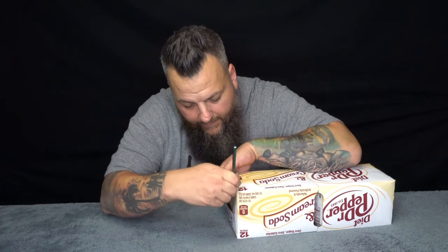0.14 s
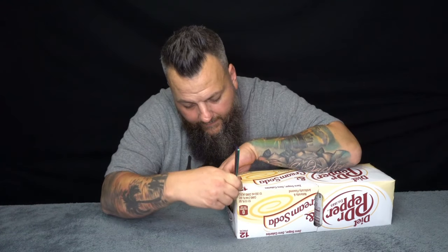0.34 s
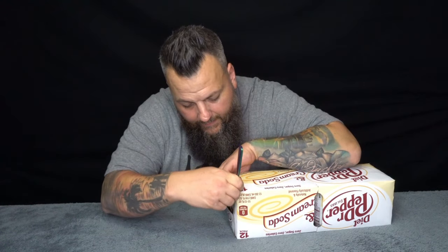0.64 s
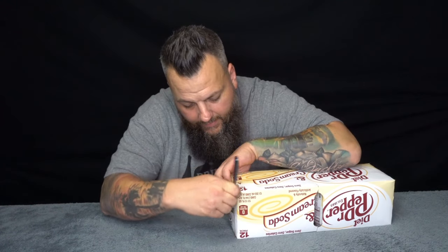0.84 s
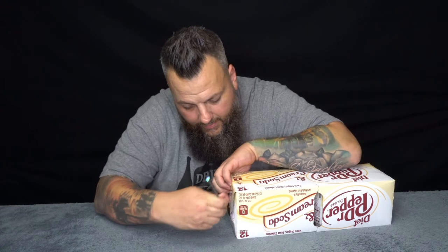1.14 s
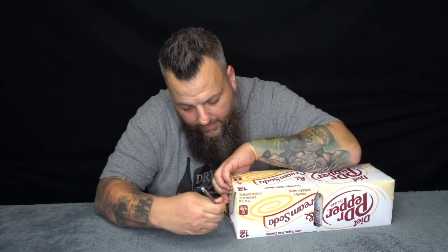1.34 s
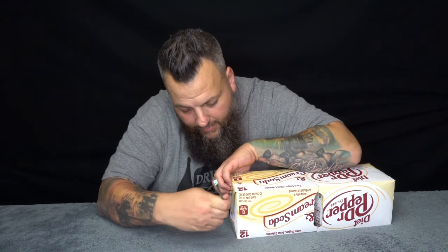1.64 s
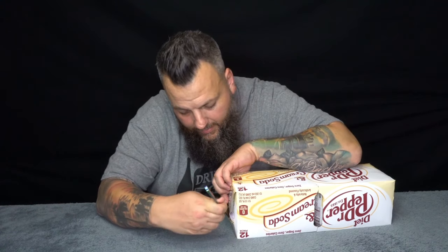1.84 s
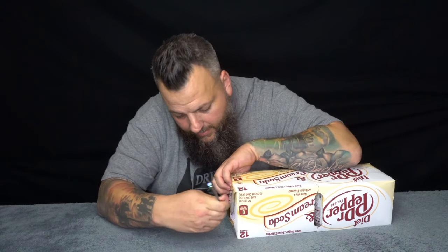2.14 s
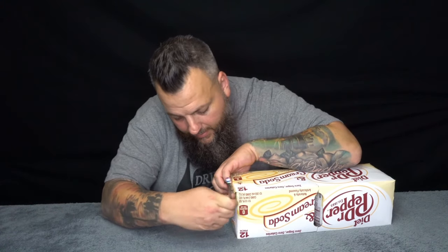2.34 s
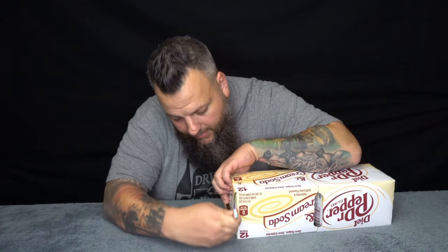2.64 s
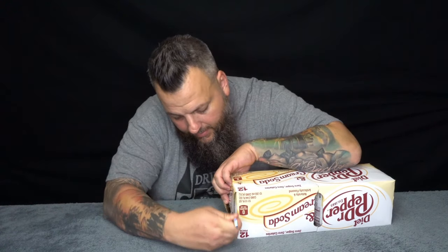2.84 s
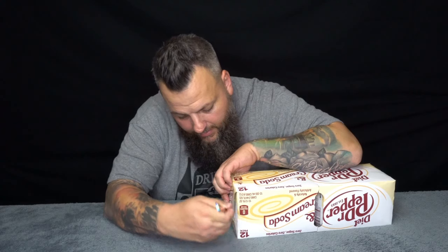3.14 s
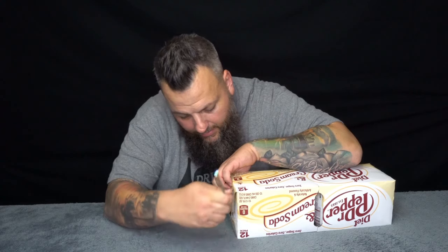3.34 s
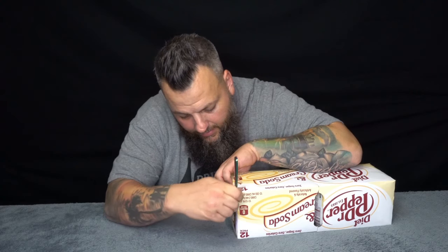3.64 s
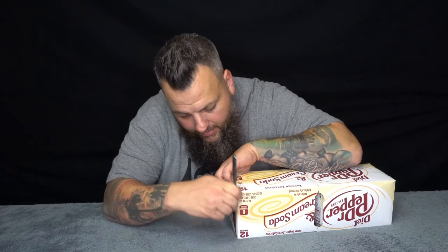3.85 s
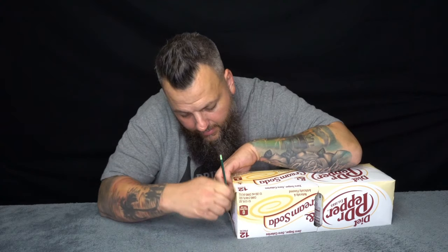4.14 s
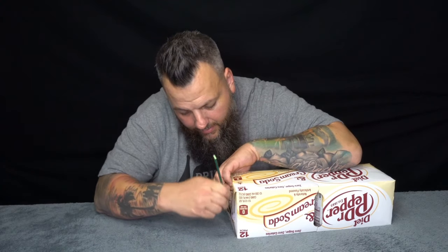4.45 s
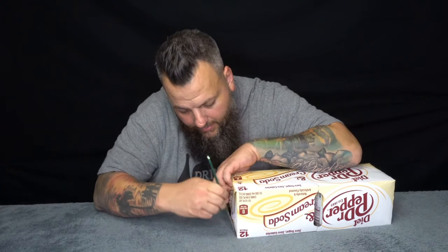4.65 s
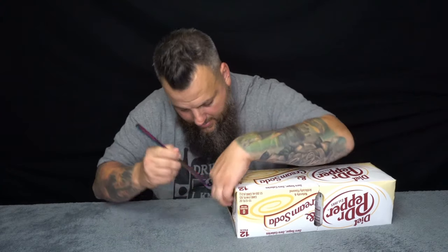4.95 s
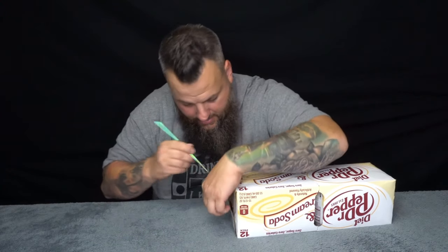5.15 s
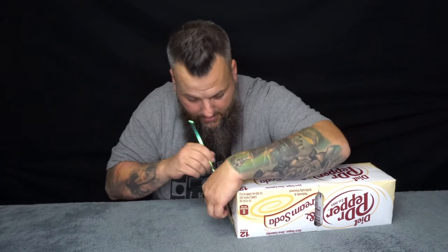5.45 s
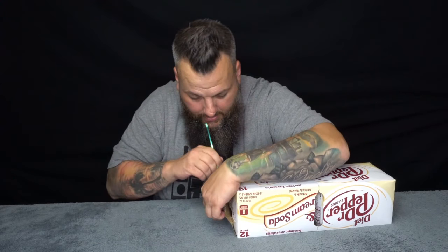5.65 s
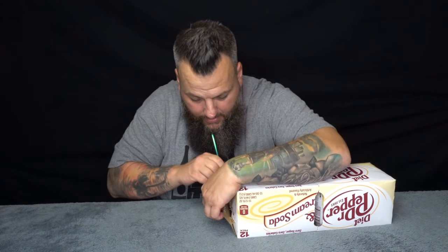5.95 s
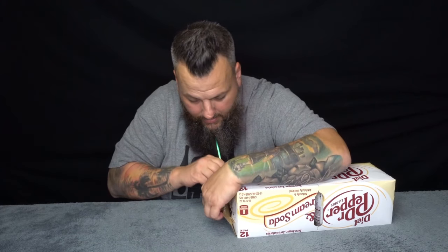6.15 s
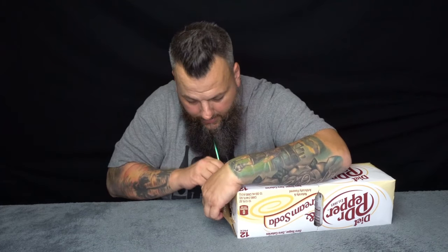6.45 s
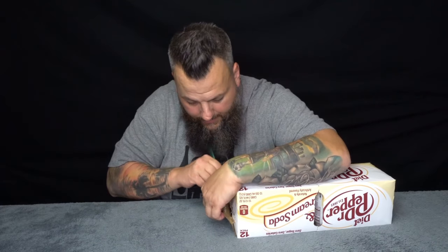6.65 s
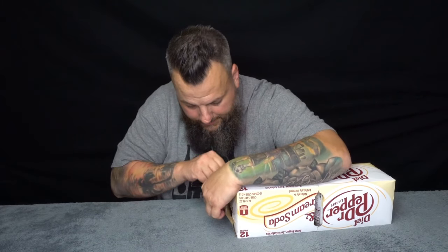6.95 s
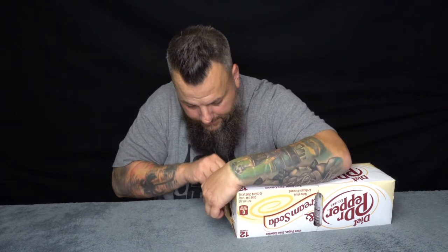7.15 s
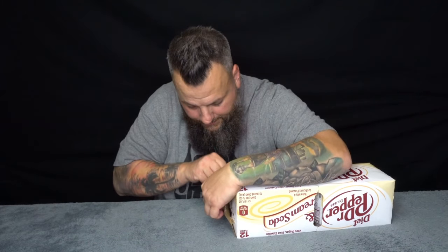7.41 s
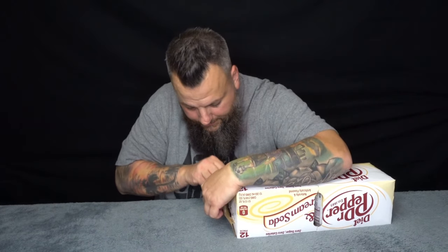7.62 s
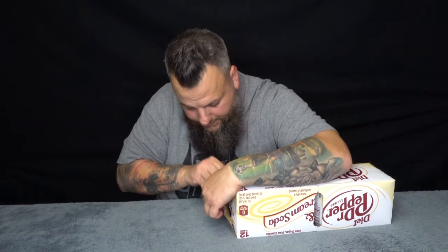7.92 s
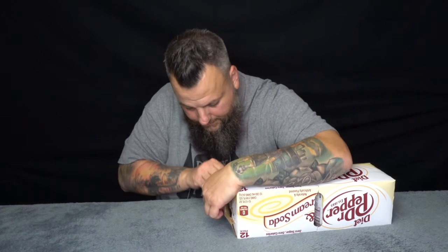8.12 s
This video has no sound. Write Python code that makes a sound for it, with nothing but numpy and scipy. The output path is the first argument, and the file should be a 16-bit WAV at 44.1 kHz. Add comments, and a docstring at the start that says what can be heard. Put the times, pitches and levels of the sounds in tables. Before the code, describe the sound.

A knife works along the glued flap of a full cardboard carton in a small, damped room with a faint low rumble. It starts with short, dry scrapes and a hollow knock at about 0.7 seconds. From 1.2 to 2 seconds fibres tear with a bright crackle, and glue snaps sharply at 1.2 and 1.9 seconds. Softer ticking and scraping lead to another snap near 3.1 seconds. From 3.7 to 4.8 seconds the blade rasps harder in quick, irregular strokes that resonate in the box, with a snap at 4.1 and a loud knock at 4.6. The flap cracks at 5.1 seconds and gives with the loudest hollow knock at 5.4. Lighter, papery scrapes and small taps follow, coming steadily from 7 seconds until the end at about 8.3, with one faint, brief squeak near 7.7.

```python
"""Knife opening a cardboard carton.

A knife saws and pries along the glued flap of a full carton in a small, damped room.
The blade sticks and slips, ringing the panels, and squeaks once on the coated card.
Fibres tear with a bright crackle, the flap knocks when it gives, and glue spots snap."""
import sys
import numpy as np
from scipy import signal
from scipy.fft import rfft, irfft, next_fast_len
from scipy.io import wavfile
from scipy.ndimage import uniform_filter1d

SR = 44100
rng = np.random.default_rng(int(sys.argv[2]) if len(sys.argv) > 2 else 0)


def to_wav(s):
    """Save 16-bit WAV."""
    ch = np.atleast_2d(s).T  # columns
    pcm = np.round(np.clip(ch, -1, 1) * 32767)  # PCM
    wavfile.write(sys.argv[1], SR, pcm.astype(np.int16))


N = 365110

# Blade strokes: (time [s], length [ms], pressure [dB], lead panel [Hz])
BLADE_STROKES = [(0.057, 104, -58, 810), (0.163, 143, -41, 740), (0.41, 410, -73, 317),
                 (0.656, 119, -31, 846), (0.9, 225, -69, 590), (1.096, 288, -56.5, 800),
                 (1.367, 88, -52.5, 454.4), (1.55, 830, -68.5, 1520), (1.95, 114, -64.5, 1800),
                 (2.2, 246, -82.5, 504), (2.438, 185, -61.5, 850), (2.57, 155, -66, 740),
                 (2.65, 168, -56.5, 750), (2.82, 130, -80, 690), (3.0, 180, -58.5, 815),
                 (3.057, 68, -40, 780), (3.53, 105, -58.5, 760), (3.62, 180, -69.5, 750),
                 (3.678, 124, -46, 730), (3.814, 110, -38.5, 717), (3.837, 25, -37.5, 694),
                 (3.859, 28, -41, 800), (3.913, 92.6, -31.5, 652), (4.076, 70, -39, 1950),
                 (4.124, 107, -31, 470), (4.19, 152, -46, 397), (4.324, 105, -33.5, 410),
                 (4.361, 40, -38, 1800), (4.405, 117, -50, 437), (4.523, 67, -39, 462),
                 (4.547, 39, -32, 910), (4.61, 214, -47, 320), (4.761, 110, -47, 650),
                 (4.82, 235, -61, 865), (4.96, 510, -55.5, 785), (5.2, 110, -95, 604),
                 (5.499, 155, -44, 720), (5.614, 115, -44, 663), (5.755, 91, -48, 477),
                 (5.8, 133, -43, 740), (6.058, 99, -49.5, 723), (6.3, 390, -66, 617),
                 (6.571, 120, -60, 1420), (6.66, 101, -55, 1250), (6.88, 145, -58, 650),
                 (7.0, 125, -43.5, 1110), (7.146, 117, -52, 1290), (7.256, 95, -47.5, 430),
                 (7.383, 120, -55.5, 1440), (7.496, 116, -44, 815), (7.58, 206, -52, 870),
                 (7.732, 131, -45.5, 926), (7.875, 121, -49.5, 307), (7.987, 112, -42.5, 743),
                 (8.133, 132, -48, 1445), (8.249, 53, -49, 810)]
# Blade hold: (time [s], flank share [0 edge rasps, 1 flank slides], tearing re pressure [dB])
BLADE_HOLD = [(0, 1, 1), (.2, 0.28, -16), (.7, 0.64, -10), (1.1, 0.84, 7.5), (1.4, 1, -10.5), (1.65, 1, 19),
              (2.0, .93, -1), (2.8, 0.64, 1.5), (3.05, 0.6, -5), (3.6, 0.23, -8), (4.1, 0.54, -6.5),
              (4.45, 0.27, -11.5), (4.76, 0.42, -2.5), (5.0, 0.27, -13.5), (5.45, 0.2, -20),
              (5.65, 0.09, -6), (7.2, 0.33, -11), (7.6, 0.35, -5), (8.28, 0.27, -9)]
def strokes():
    """Stick-slip rings the panels and tears fibres; strained fibres keep ticking between strokes."""
    edge_rise, flank_rise = 0.32, 0.44  # share of a stroke spent gaining speed
    drag_rise_ms, drag_ms, drag_db, flap_panel_hz = 0.74, 82, -23, 1720  # blade drags after each knock
    friction = slips(per_s=3500, spread_db=2.67, clump_db=2.34, clump_s=0.0067)
    breaks = slips(per_s=6000, spread_db=2.8, clump_db=0.99, clump_s=0.0079)
    ticks = slips(per_s=220, spread_db=2.2, clump_db=3.5, clump_s=0.03)
    hold_s, flank_share, tear_db = np.transpose(BLADE_HOLD)
    flank = np.interp(np.arange(N) / SR, hold_s, flank_share)
    crackle = fibre_crackle(breaks, ticks, flank)
    moves = [(s, ms * np.interp(flank[round(s * SR)], [0, 1], [edge_rise, flank_rise]), ms, db, hz)
             for s, ms, db, hz in BLADE_STROKES]
    moves += [(s, drag_rise_ms, drag_ms, db + drag_db, flap_panel_hz) for s, db, *_ in FLAP_KNOCKS]
    out, tearing = np.zeros(N), np.zeros(N)
    grips = rng.standard_normal((len(moves), 3, len(PANEL_MODES)))
    for (s, rise_ms, ms, db, hz), grip in zip(moves, grips):
        speed = blade_speed(rise_ms, ms - rise_ms)
        drive = friction[round(s * SR):][:len(speed)]
        panels = signal.oaconvolve(speed[:len(drive)] * drive, panel_ring(hz, grip, lead_db=10.6))
        add(out, s, gain_of(db) * panels)
        add(tearing, s, gain_of(db + np.interp(s, hold_s, tear_db)) * speed ** 2.17)
    # Bent card is under strain before and after each stroke.
    strain = gain_of(-8.5) * uniform_filter1d(np.sqrt(tearing), round(0.2 * SR)) ** 2
    ticking = gain_of(1) * strain * flank * patchy(coloured(ticks, SLIDE_SPECTRUM), depth_db=6)
    return out + (tearing + strain) * crackle + ticking


def blade_speed(rise_ms, fall_ms):
    """One move, from rest to full speed and back."""
    rise = np.linspace(0, np.pi / 2, round(rise_ms * SR / 1000))
    fall = np.linspace(0, np.pi / 2, round(fall_ms * SR / 1000))
    return np.r_[np.sin(rise) ** 0.9, np.cos(fall) ** 1.5]


def slips(per_s, spread_db, clump_db, clump_s):
    """Random clicks in clumps, mostly small, a few large."""
    sizes = gain_of(spread_db * np.minimum(rng.exponential(1, N), 5))
    clicks = sizes * (rng.random(N) < per_s / SR)
    width = round(clump_s * SR)
    clumps = unit_rms(uniform_filter1d(uniform_filter1d(rng.standard_normal(N), width), width))
    return unit_rms(clicks * rng.choice([-1., 1.], N) * gain_of(clump_db * clumps))


# Carton panel modes: (frequency [Hz], level [dB], t60 [s])
PANEL_MODES = [(184.6, 3.5, 0.12), (308.5, -2.5, 0.27), (387, 3.5, 0.13), (473.6, 7, 0.094),
               (601, 8, 0.043), (688, 11.5, 0.047), (788.3, 14.5, 0.043), (903, 14, 0.025),
               (1055, 9, 0.041), (1187, 16, 0.026), (1370, 17.5, 0.017), (1615, 14.5, 0.017),
               (1795, 9.5, 0.061), (2056, 12.5, 0.0088), (2670, -5, 0.011)]
def panel_ring(lead_hz, grip, lead_db):
    """Carton impulse response: modes near the pushed panel lead; the grip weights and bends each."""
    hz, db, t60 = np.transpose(PANEL_MODES)[:, :, None]
    weight, bend, twin_spread = grip[:, :, None]
    t = np.arange(4000) / SR
    db = db + lead_db * np.exp(-(np.log(hz / lead_hz) / 0.066) ** 2) + 2.5 * weight
    hz = hz * (1 + 0.03 * bend)
    twin_hz = hz * (1.035 + 0.015 * twin_spread)  # opposite panel
    pairs = np.sin(2 * np.pi * hz * t) + 0.7 * np.sin(2 * np.pi * twin_hz * t)
    modes = (gain_of(db - 60 * t / t60) * pairs).sum(0)
    low_cut = signal.butter(4, 230, "high", fs=SR, output="sos")  # a small box radiates no deep bass
    modes = signal.sosfilt(low_cut, modes)
    return modes / np.linalg.norm(modes)


# Rasping edge: (frequency [Hz], density [dB])
RASP_SPECTRUM = [(1200, -11.5), (2100, -3.5), (3000, -1.5), (3600, -7), (4300, -10), (5300, -14),
                 (7800, -13.5), (10400, -25.5), (16000, -29)]
# Sliding flank: (frequency [Hz], density [dB])
SLIDE_SPECTRUM = [(1470, -14.5), (2500, -8), (3360, -16), (4020, -7.5), (4620, -9), (5520, -2.5),
                  (6650, -7.5), (13100, -18.5), (16000, -24.5)]
# Papery ring of the loosening flap: (time [s], frequency [Hz], gain [dB])
FLAP_RING = [(0.8, 2670, 7.5), (4.9, 4330, -4), (5.6, 4250, 7.5), (5.85, 3930, 9.5), (8.28, 4020, 6.5)]
def fibre_crackle(breaks, ticks, flank):
    """Fibres break under the sliding flank or the rasping edge; the rasp rings the flap."""
    slide = unit_rms(coloured(breaks + 0.42 * ticks, SLIDE_SPECTRUM))
    rasp = coloured(breaks + 0.091 * ticks, RASP_SPECTRUM)
    flap_s, flap_hz, flap_db = np.transpose(FLAP_RING)
    t = np.arange(N) / SR
    flap = resonate(rasp, np.interp(t, flap_s, flap_hz), width_hz=220)
    rasp = unit_rms(rasp + gain_of(np.interp(t, flap_s, flap_db)) * flap)
    return patchy(flank * slide + (1 - flank) * rasp, depth_db=2.8)


def patchy(x, depth_db):
    """Each torn bit of card has its own colour: random patches over time and pitch."""
    spectra = signal.stft(x, nperseg=128)[2]
    patches = uniform_filter1d(rng.standard_normal(spectra.shape), 4, axis=0)
    patches = unit_rms(uniform_filter1d(patches, 10, axis=1))
    return unit_rms(signal.istft(spectra * gain_of(depth_db * patches), nperseg=128)[1][:N])


# Blows on the carton: (time [s], ring peak [dB], contact [ms], lead panel [Hz])
FLAP_KNOCKS = [(0.399, -38, 0.19, 467), (0.662, -25.5, 0.31, 600), (0.933, -46, 0.14, 600),
               (1.037, -44, 0.34, 546), (1.113, -44, 0.21, 474), (1.242, -25, 0.18, 758),
               (1.385, -40.5, 0.098, 474), (1.891, -21, 0.065, 375), (3.067, -34, 0.079, 850),
               (3.407, -43.5, 0.1, 600), (3.489, -45, 0.073, 700), (3.924, -25.5, 0.16, 476),
               (4.094, -29, 0.35, 737), (4.568, -16, 0.89, 480), (4.691, -36, .12, 1570),
               (4.767, -38, 0.15, 820), (4.99, -46, 0.18, 810), (5.09, -22.5, 0.092, 734),
               (5.193, -42.5, 0.07, 565), (5.426, -35.5, 0.36, 1800), (5.437, -14.5, 0.34, 494.5),
               (5.439, -19, .2, 1790), (6.287, -35.5, 0.21, 396), (6.495, -44, 0.26, 690),
               (6.773, -35.5, 0.11, 580), (6.88, -44, 0.14, 836), (6.995, -42, 0.33, 397),
               (7.297, -33.5, 0.67, 374.5), (8.201, -32, 0.085, 2040)]
def knocks():
    """A push with a gritty tail rings the panels, brighter for short contact; the surface ticks."""
    out, t = np.zeros(N), np.arange(600) / SR
    grips = rng.standard_normal((len(FLAP_KNOCKS), 3, len(PANEL_MODES)))
    for (s, db, contact_ms, hz), grip in zip(FLAP_KNOCKS, grips):
        grit = rng.standard_normal(len(t))
        contacts = t * 1000 / contact_ms
        push = contacts * np.exp(-3 * contacts)
        tail = 0.041 * grit * t / 0.0077 * np.exp(-t / 0.0044)
        knock = np.convolve(push + tail, panel_ring(hz, grip, lead_db=14))
        add(out, s, gain_of(db) * knock / abs(knock).max())
        tick = coloured(grit * np.exp(-t / 0.0056), RASP_SPECTRUM)
        add(out, s, gain_of(db - 9.5 - 13 * contact_ms) * tick)
    return out


# Glue spots and fibre bundles: (time [s], peak [dB], pitch [Hz])
GLUE_SNAPS = [(0.514, -56, 2170), (0.59, -52, 8000), (0.953, -43.5, 8000), (1.2433, -20, 4600),
              (1.268, -33, 5500), (1.32, -43, 6500), (1.3338, -35, 5700), (1.447, -40, 4870),
              (1.67, -50, 6100), (1.734, -38, 5550), (1.796, -35, 6050), (1.834, -35.5, 5560),
              (1.8765, -30.5, 5860), (1.8901, -17, 5030), (1.98, -36.5, 5800), (2.0156, -25, 3880),
              (2.495, -40, 5180), (2.527, -44, 4500), (2.714, -33, 4840), (2.731, -35, 6230),
              (2.748, -35.5, 5600), (3.0699, -20.5, 4380), (4.056, -36, 7000), (4.0947, -20.5, 2300),
              (4.647, -35.5, 4560), (5.0883, -21.5, 2770), (6.362, -46, 5900)]
def snaps():
    """A burst of crackle peaking at the pitch of the breaking piece; smaller pieces break quicker."""
    decay_ms, decay_ms_per_db = 6.9, 0.24
    out, t = np.zeros(N), np.arange(1500) / SR
    for s, db, hz in GLUE_SNAPS:
        grit = rng.standard_normal(len(t))
        attack = np.minimum(t / 0.0005, 1)
        decay = np.exp(-t * 1000 / max(decay_ms + decay_ms_per_db * db, 0.5))
        tone = signal.lfilter(*signal.iirpeak(hz, 2.5, SR), grit)
        rolloff = [(hz * 1.3, 0), (hz * 4, -17)]
        crackle = coloured(coloured(grit, SLIDE_SPECTRUM), rolloff)
        snap = (unit_rms(crackle) + 1.2 * unit_rms(tone)) * attack * decay
        add(out, s, gain_of(db) * snap / abs(snap).max())
    return out


# Blade on coated card: (time [s], length [ms], pitch [Hz], mean amplitude [dB])
BLADE_SQUEAKS = [(7.7, 40, 2620, -53)]
def squeaks():
    """Regular stick-slip makes a short, rough tone."""
    out = np.zeros(N)
    for s, ms, hz, db in BLADE_SQUEAKS:
        size = round(ms * SR / 1000)
        waver = 1 + 0.5 * uniform_filter1d(rng.standard_normal(size), 25)
        tone = np.sin(2 * np.pi * np.cumsum(hz * waver) / SR)
        add(out, s, gain_of(db) * 2 * np.hanning(size) * tone)
    return out


# Room decay: (frequency [Hz], t60 [s])
ROOM_T60 = [(250, 0.41), (1400, 0.31), (9000, 0.22)]
def room_echo(x):
    """Sparse reflections from 4 ms on, each band dying at its own rate."""
    taps = np.zeros(SR // 2)
    slots = np.arange(180, len(taps) - 20, 20)
    taps[slots + rng.integers(0, 20, len(slots))] = rng.choice([-1., 1.], len(slots))
    hz, t, spectra = signal.stft(taps, SR, nperseg=256)
    decay = gain_of(-60 * t / at_hz(ROOM_T60, hz)[:, None])
    tail = signal.istft(spectra * decay, SR, nperseg=256)[1]
    return signal.oaconvolve(x, tail / np.linalg.norm(tail))[:N]


# Room tone: (frequency [Hz], density [dB])
AIR_SPECTRUM = [(12, -51), (20, 9), (44, -1), (216, -13.5), (367, -13), (718, -18), (3440, -28.5),
                (6180, -30), (14700, -38), (16000, -66)]
def room_tone():
    """Steady noise, mostly low rumble."""
    return unit_rms(coloured(rng.standard_normal(N), AIR_SPECTRUM))


def gain_of(db):
    """Decibels to amplitude."""
    return 10 ** (np.asarray(db) / 20)


def unit_rms(x):
    """Scales to rms 1."""
    return x / np.sqrt(np.mean(x ** 2) + 1e-20)


def at_hz(table, hz):
    """Interpolates along log frequency."""
    table_hz, values = np.transpose(table)
    return np.interp(np.log(hz + 1), np.log(table_hz + 1), values)


def add(mix, s, sound):
    """Mixes a sound in at s seconds."""
    part = mix[round(s * SR):][:len(sound)]
    part += sound[:len(part)]


def coloured(x, spectrum):
    """Filters by a spectrum in dB."""
    size = next_fast_len(len(x))
    gains = gain_of(at_hz(spectrum, np.fft.rfftfreq(size, 1 / SR)))
    return irfft(rfft(x, size) * gains, size)[:len(x)]


def resonate(x, hz, width_hz):
    """Unity-gain resonance following the curve hz."""
    carrier = np.exp(2j * np.pi * np.cumsum(hz) / SR)
    pole = np.exp(-np.pi * width_hz / SR)
    return 2 * (carrier * signal.lfilter([1 - pole], [1, -pole], x / carrier)).real


def scene():
    """Knife and carton, their echo and the room tone, in mono."""
    echo_db, air_db = -11, -67
    work = strokes() + knocks() + snaps() + squeaks()
    air = gain_of(air_db) * room_tone()
    return (work + gain_of(echo_db) * room_echo(work) + air)[None]


def record(dry):
    """Steep low-pass band limit."""
    cutoff_hz = 15900
    low_pass = signal.firwin(511, cutoff_hz, window=("kaiser", 9), fs=SR)
    return signal.oaconvolve(dry, low_pass[None], "same")


dry = scene()
out = record(dry)
to_wav(out)
```